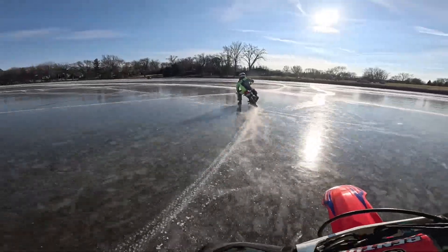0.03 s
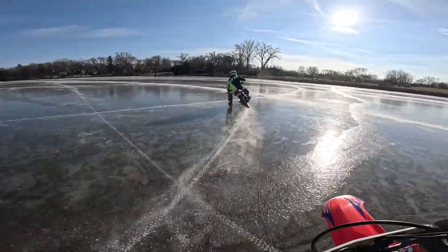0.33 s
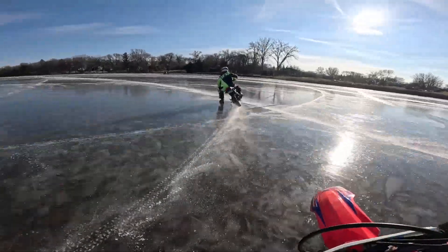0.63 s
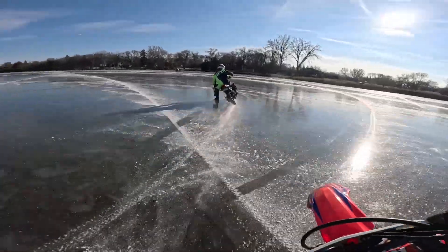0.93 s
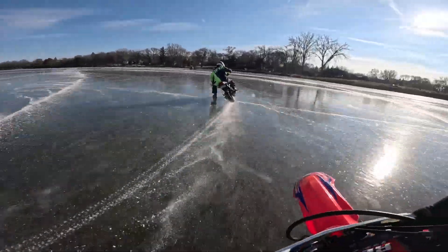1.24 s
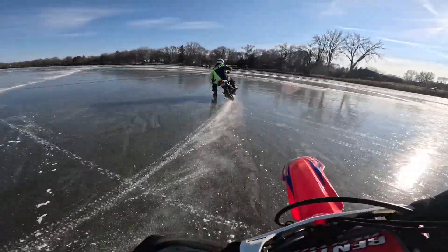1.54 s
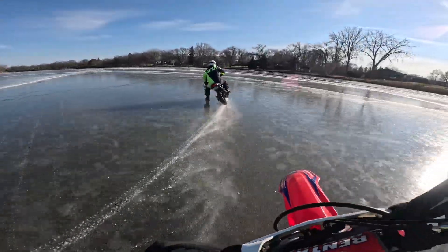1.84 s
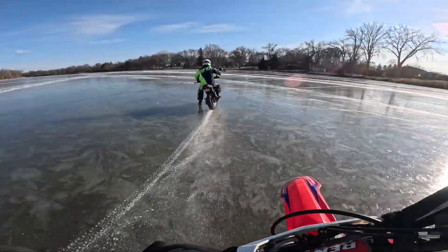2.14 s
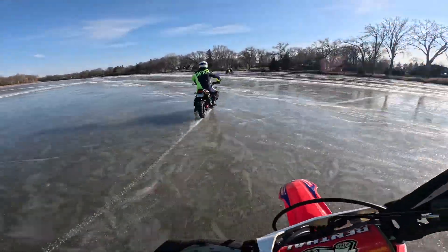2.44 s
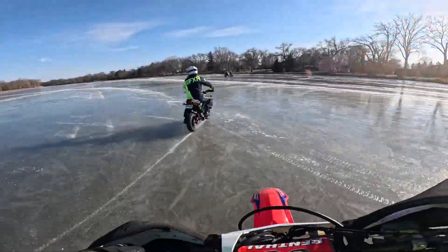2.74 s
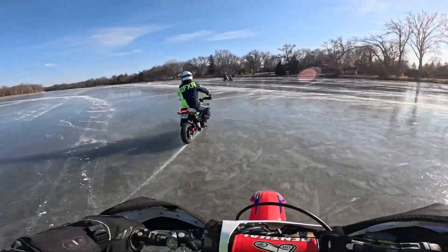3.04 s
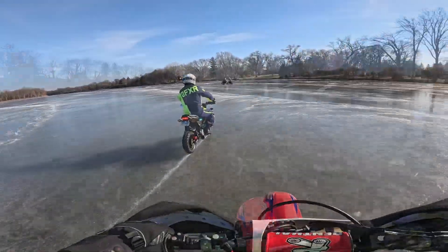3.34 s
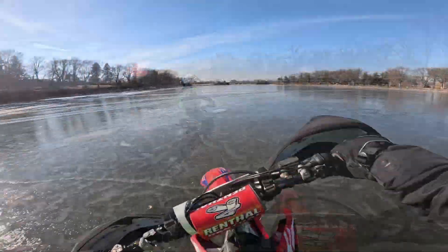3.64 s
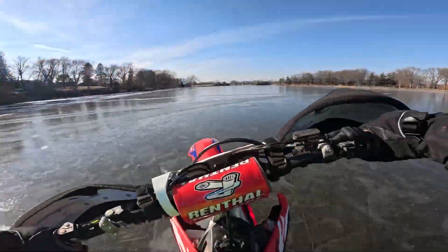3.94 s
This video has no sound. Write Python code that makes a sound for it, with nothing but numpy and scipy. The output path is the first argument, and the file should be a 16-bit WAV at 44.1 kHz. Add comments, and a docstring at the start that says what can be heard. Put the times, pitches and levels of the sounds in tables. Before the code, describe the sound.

A dirt bike engine drones, burbles down, then runs faster, with wind and tyres on ice.

```python
"""A single-cylinder dirt bike follows another across a frozen lake, heard from the rider's helmet.
From the start each firing thumps, barks and puffs gas; wind buffets the microphone, studs grind the ice.
At 1.9 s the bike ahead rasps louder, then recedes. From 2.3 s the rider rolls off a steady throttle
and the engine burbles down in thuds and knocks. From 3.3 s the engines dissolve into a faster run
with a booming intake, while wind and tyres go on."""
import sys
import numpy as np
from scipy import signal
from scipy.fft import rfft, irfft
from scipy.io import wavfile

SR = 44100
rng = np.random.default_rng(int(sys.argv[2]) if len(sys.argv) > 2 else 0)


def unload_wav(signal):
    """Save mono or channel-first audio to the path in sys.argv[1] as 16-bit WAV at rate SR, clipped to [-1, 1]."""
    wavfile.write(
        sys.argv[1],
        SR,
        np.round(np.clip(np.atleast_2d(signal).T, -1, 1) * 32767).astype(np.int16),
    )


N = 176400
TIME = np.arange(N) / SR


def from_db(db):
    """Decibels to gain."""
    return 10 ** (np.asarray(db) / 20)


def unit_rms(x):
    """Scale to unit power."""
    return x / np.sqrt(np.mean(x ** 2) + 1e-20)


def curve(rows, column=1):
    """One table column at every sample."""
    rows = np.array(rows)
    return np.interp(TIME, rows[:, 0], rows[:, column])


def swells(rows, width_s):
    """Gaussian bump of gain at each (time_s, level_db)."""
    return sum(from_db(db) * np.exp(-.5 * ((TIME - s) / width_s) ** 2) for s, db in rows)


def drift(rate_hz):
    """Slow random wander, unit RMS."""
    hop, warmup = 40, 2000
    pole = np.exp(-2 * np.pi * rate_hz * hop / SR)
    noise = rng.standard_normal(N // hop + warmup + 2)
    slow = signal.lfilter([1], [1, -2 * pole, pole * pole], noise)[warmup:]
    return np.interp(np.arange(N) / hop, np.arange(len(slow)), unit_rms(slow))


def body(x, spectrum, size=8192):
    """Ring x through a minimum-phase response given as (freq_hz, gain_db)."""
    hz, db = np.transpose(list(spectrum) + [(SR / 2, spectrum[-1][1] - 100)])
    grid_hz = np.maximum(np.arange(size // 2 + 1) * SR / size, 1)
    gain = from_db(np.interp(np.log(grid_hz), np.log(hz), db))
    cepstrum = irfft(np.log(gain))
    causal_fold = np.r_[1, np.full(size // 2 - 1, 2), 1, np.zeros(size // 2 - 1)]
    impulse = irfft(np.exp(rfft(cepstrum * causal_fold)))[:size // 2]
    return signal.fftconvolve(x, impulse)[:N]


def firing_times(rate_rows, anchor_s):
    """One firing per engine cycle, one of them at anchor_s."""
    cycles = np.cumsum(curve(rate_rows)) / SR
    cycles -= np.interp(anchor_s, TIME, cycles)
    return np.interp(np.arange(np.ceil(cycles[0]), cycles[-1]), cycles, TIME)


def pulses(times, uneven_db, jitter_s):
    """A click per firing, scattered in strength and time."""
    strength, timing = rng.standard_normal((400, 2))[:len(times)].T
    onsets = np.clip((times + jitter_s * timing) * SR, 0, N - 1).astype(int)
    clicks = np.zeros(N)
    clicks[onsets] = unit_rms(from_db(uneven_db * strength))
    return clicks


def gas_puffs(clicks, decay_s):
    """Turbulence dying away after each click."""
    envelope = signal.lfilter([1], [1, -np.exp(-1 / (decay_s * SR))], clicks + 1e-18)
    return unit_rms(envelope) * rng.standard_normal(N)


def off_ice(x, delay_s=.00256, echo_gain=.38):
    """Direct sound plus its reflection from the ice: a hollow colour."""
    return x + echo_gain * np.interp(TIME - delay_s, TIME, x, left=0)


# Ridden engine speed: time_s, firing_hz
RIDDEN_RATE = [(0,56.25),(.28,56.3),(.48,56.85),(.75,56.7),(1,56.8),(1.33,57.1),(1.9,57.25),(2.07,56.3),(2.15,54.9),(2.27,54.3),(2.35,50.2),(2.45,47.5),(2.55,49.4),(2.65,49.4),(2.92,47.4),(3.1,44.6),(3.27,40.4),(3.5,36.3)]
# Ridden engine load: time_s, pull_db, pipe_ring_db, overrun_thud_db, overrun_rattle_db
THROTTLE = [(0,-2.5,-15,-37,-15),(.3,-1.5,-20,-10,-29),(1.1,-0.5,-1,-21,-22),(1.5,-2,2,-6,-6),(1.85,-2,5.5,-21,-28),(2.22,-3.5,1.5,-10,-18),(2.36,-9,-6,-0.5,-24),(2.65,-45,-24,-2,-3),(2.9,-29,-12,-0.5,-1),(3.08,-31.5,-24,0,-7),(3.5,-28,-23,-0.5,-18)]
# Exhaust responses to a firing: freq_hz, gain_db
BARK = [(100,-15),(400,9),(510,21),(630,20),(680,12),(770,23),(880,7),(1030,5),(1330,-7),(1540,11),(1700,6),(1880,18),(2010,14.5),(2120,14),(2450,-9),(3600,-5),(5000,-23),(12000,-66)]
THUMP = [(30,-5.5),(57,5.5),(113,19.5),(172,30),(230,29.5),(290,23),(345,25.5),(400,27),(470,13.5),(700,7.5),(1500,-35.5)]
PIPE_RING = [(300,-15.5),(950,0),(1120,-3),(1270,-14.5),(1430,10),(1600,10.5),(1800,-15),(2300,-35),(3500,-4.5)]
# Outrushing gas and its gruff surges: freq_hz, density_db
GAS_RASP = [(100,-18),(300,-11.5),(750,-18.5),(1150,-31),(1900,-18),(2600,-38),(3600,-33.5),(5000,-44.5),(8000,-53),(12000,-73.5)]
CHUFF = [(150,-10.5),(400,-13),(600,-17.5),(850,-22.5),(1200,-30),(4000,-60)]
# Surges as the throttle is worked: time_s, level_db
CHUFF_PEAKS = [(.035,2),(.99,-6),(1.955,-2),(2.185,-3)]
def ridden_bike():
    """Under throttle each firing thumps, barks, rings the pipe and lets out a puff of gas."""
    times = firing_times(RIDDEN_RATE, anchor_s=.7392)
    clicks = pulses(times, uneven_db=1.0, jitter_s=.00001)
    thumps = pulses(times + .00075, uneven_db=1.45, jitter_s=.00005)
    puffs = gas_puffs(clicks, decay_s=.0045)
    pull = body(puffs, GAS_RASP) - body(clicks, BARK) + body(thumps, THUMP)
    ring = from_db(curve(THROTTLE, column=2)) * body(clicks, PIPE_RING)
    chuffs = body(puffs * swells(CHUFF_PEAKS, width_s=.024), CHUFF)
    return from_db(curve(THROTTLE)) * pull - ring + off_ice(chuffs)


# Leading engine speed: time_s, firing_hz
AHEAD_RATE = [(0,51),(1.2,51),(1.55,53),(1.66,51.8),(1.8,51.7),(1.95,52.7),(2.05,53.7),(2.3,53.4),(3.5,51)]
# Its loudness: time_s, level_db
AHEAD_LEVEL = [(0,-9.5),(.7,-15),(1.2,-10.5),(1.5,-7.5),(1.72,-9),(1.88,1.5),(1.96,-3),(2.02,-6.5),(2.2,-2.5),(2.4,-8.5),(2.8,-11),(3.1,-24),(3.5,-16.5)]
# Its exhaust response: freq_hz, gain_db
AHEAD_BARK = [(30,-8),(52,27),(104,27),(155,22),(210,30),(320,19),(480,4),(700,13),(1100,6),(1600,10),(2200,10),(2450,0),(2800,12),(3100,4),(3600,2),(5000,-25)]
# Its outrushing gas: freq_hz, density_db
AHEAD_RASP = [(100,-12),(500,-15),(1000,-28),(1600,-19),(2200,-22),(3200,-31),(5000,-41),(8000,-57.5)]
def bike_ahead():
    """The leading exhaust points back at the rider and beats against the near engine."""
    times = firing_times(AHEAD_RATE, anchor_s=1.7925)
    clicks = pulses(times, uneven_db=1.3, jitter_s=.00003)
    rasp = body(gas_puffs(clicks, decay_s=.0035), AHEAD_RASP)
    return from_db(curve(AHEAD_LEVEL)) * (body(clicks, AHEAD_BARK) + rasp)


# Wind rumble: freq_hz, density_db
WIND_RUMBLE = [(15,-3.5),(30,-2.5),(50,0.5),(80,-1.5),(130,-1.5),(220,-3),(330,-8),(480,-19),(800,-26),(2000,-30),(12000,-81)]
# Wind strength and deep buffets: time_s, level_db
WIND_LEVEL = [(0,3.7),(.7,1.6),(1.7,3.2),(2.4,1.4),(2.8,3.4),(4,-1.3)]
BUFFET_PEAKS = [(.29,-19),(1.21,-15),(1.88,-22),(2.09,-22)]
def wind(lumpy_db=.6, eddy_hz=40.8):
    """Air rumbles unevenly at the microphone; eddies add a few deep buffets."""
    turbulence = rng.standard_normal(N) * from_db(curve(WIND_LEVEL) + lumpy_db * drift(rate_hz=13))
    pitch_hz = eddy_hz * (1 + .24 * drift(rate_hz=34.2))
    eddies = np.sin(2 * np.pi * np.cumsum(pitch_hz) / SR)
    return body(turbulence, WIND_RUMBLE) + swells(BUFFET_PEAKS, width_s=.025) * eddies


# Studs on ice: freq_hz, density_db
ICE_GRIND = [(200,-21),(600,-21.5),(1100,-22),(2000,-27),(3300,-30),(4300,-39),(5300,-43),(6500,-50),(8500,-54.5),(10000,-60.5),(12000,-73.5)]
# Grinding strength: time_s, level_db
ICE_LEVEL = [(0,3),(.28,0),(.5,-5),(1.1,0),(1.9,3),(2.4,4),(2.8,-1),(3.05,-6),(3.3,-6.5),(3.48,2),(3.65,-2),(4,-1)]
def tyres(patchy_db=1.5, chips_per_s=2700, chip_gain=.12):
    """Studs grind the ice and throw up small chips."""
    sizes = from_db(5 * np.minimum(rng.exponential(1, N), 4))
    chips = (rng.random(N) < chips_per_s / SR) * rng.choice([-1, 1], N) * sizes
    grind = rng.standard_normal(N) + chip_gain * unit_rms(chips)
    level_db = curve(ICE_LEVEL) + patchy_db * drift(rate_hz=29)
    return body(grind * from_db(level_db), ICE_GRIND)


# Overrun responses to a firing: freq_hz, gain_db
THUD = [(30,-21),(60,14),(100,18),(125,25),(146,37),(185,33),(235,32.5),(310,31.5),(400,20),(490,-4),(900,-10),(2000,-12)]
RATTLE = [(200,-17.5),(700,-44.5),(1450,-33),(1880,-23.5),(2130,-24),(2350,-43),(2800,-39.5),(4000,-40.5),(8000,-67.5)]
def overrun(knock_db=31):
    """Firings give dull thuds, ringing knocks and a dry rattle, strongest with the throttle closed."""
    times = firing_times(RIDDEN_RATE, anchor_s=3.0568)
    clicks = pulses(times, uneven_db=1.1, jitter_s=.0001)
    knocks = from_db(knock_db) * pulses(times, uneven_db=2.5, jitter_s=.0001)
    thuds = body(clicks * from_db(curve(THROTTLE, column=3)), THUD)
    rattle = body(knocks + gas_puffs(clicks, decay_s=.004), RATTLE)
    return thuds + from_db(curve(THROTTLE, column=4)) * off_ice(rattle)


# Engine speed on the faster run: time_s, firing_hz
FAST_RATE = [(3.42,58.8),(3.46,60),(3.6,69.2),(3.63,69.3),(3.71,67.3),(3.8,67.9),(3.89,69.3),(3.94,70.3),(4,69.8)]
# Engine load: time_s, boom_db, crack_db, rasp_db
FAST_LOAD = [(3.46,-7,-14,-16),(3.51,3,-12,-13),(3.55,3,-8,6),(3.62,4.5,-10,1),(3.76,2.5,-9,1),(3.8,-1,-1,1),(3.88,1.5,2,1.5),(4,1.5,0,-.5)]
# Intake and exhaust responses to a firing: freq_hz, gain_db
INTAKE_BOOM = [(30,14),(68,4),(135,22),(205,32.5),(240,38),(275,37.5),(340,25),(480,11),(620,0),(850,-17.5)]
FAST_CRACK = [(200,-20),(480,8),(620,11),(750,-2),(1080,2),(1230,17),(1400,4),(1550,8),(1750,6),(2150,9),(2500,-4),(3400,-6),(4400,-2),(5200,-21),(8000,-32)]
FAST_RING = [(1200,-25),(2250,1),(2750,4),(3400,-1),(5000,-20)]
# Outrushing gas: freq_hz, density_db
FAST_RASP = [(100,-32),(330,-3),(600,-29),(1700,-28),(2400,-22),(4300,-23),(4900,-40),(7700,-50),(10000,-69)]
def fast_run():
    """Higher revs: the intake growls, then booms; the exhaust cracks, rings and rasps brightly."""
    times = firing_times(FAST_RATE, anchor_s=3.8238)
    gulps = pulses(times, uneven_db=1.3, jitter_s=.00004)
    clicks = pulses(times, uneven_db=1.0, jitter_s=.00001)
    growl = body(gulps * swells([(3.535, 2), (3.61, -8)], width_s=.032), THUD)
    boom = from_db(curve(FAST_LOAD)) * body(gulps, INTAKE_BOOM)
    crack = from_db(curve(FAST_LOAD, column=2)) * body(clicks, FAST_CRACK)
    ring = body(clicks, FAST_RING)
    rasp = from_db(curve(FAST_LOAD, column=3)) * body(gas_puffs(clicks, decay_s=.007), FAST_RASP)
    return rasp - (growl + boom + crack + ring)


def scene(dissolve_s=(3.32, 3.8)):
    """The chase dissolves into the faster run; wind and tyres go on throughout."""
    fade = np.interp(TIME, dissolve_s, [0, 1])
    chase = ridden_bike() + overrun() + off_ice(bike_ahead())
    engines = np.sqrt(1 - fade) * chase + fade * fast_run()
    return (engines + wind() + off_ice(tyres()))[None]


def record(dry):
    """Soft-clip the peaks, then cut the top treble."""
    ceiling, cutoff_hz = .8, 14800
    rounded = dry / (1 + (dry / ceiling) ** 8) ** (1 / 8)
    return signal.sosfilt(signal.cheby2(12, 70, cutoff_hz, fs=SR, output="sos"), rounded)


dry = scene()
out = record(dry)
unload_wav(out)
```